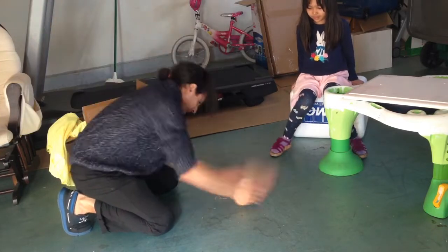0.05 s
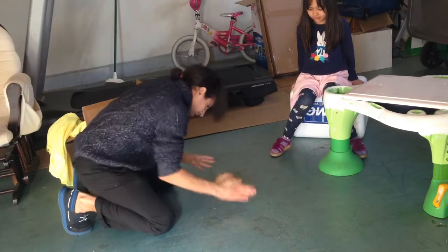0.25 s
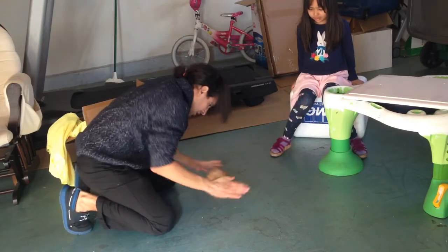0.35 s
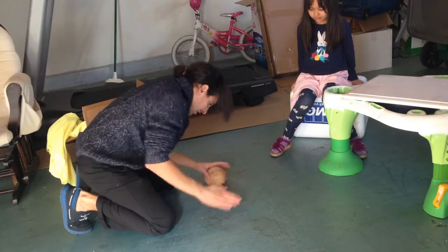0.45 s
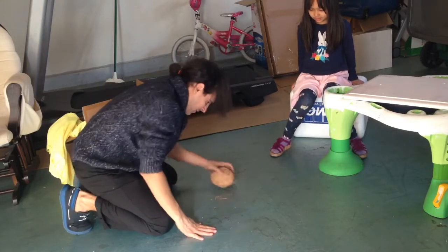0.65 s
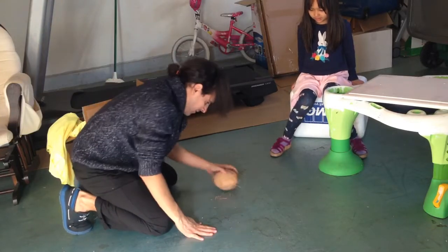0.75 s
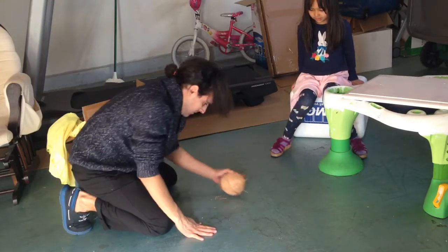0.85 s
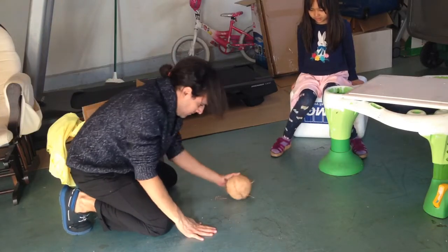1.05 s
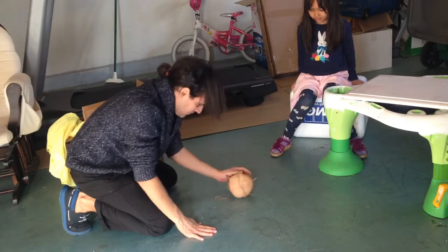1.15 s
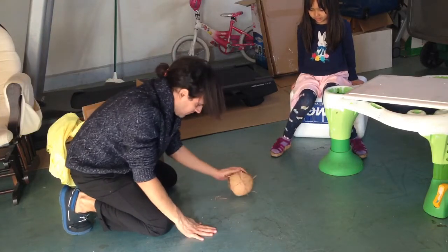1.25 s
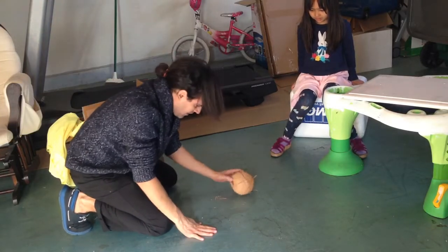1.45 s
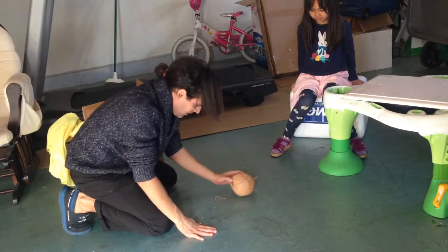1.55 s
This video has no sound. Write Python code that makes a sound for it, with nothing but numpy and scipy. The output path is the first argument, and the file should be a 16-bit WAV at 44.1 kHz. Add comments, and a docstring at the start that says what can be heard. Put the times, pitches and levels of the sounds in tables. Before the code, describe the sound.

A coconut is slammed on a hard floor, cracking sharply with a hollow boom and a light clack. A soft thud and a faint tap follow, each echoing briefly in a garage over a low rumble and hiss.

```python
"""Cracking a coconut on a garage floor

A hand slams a coconut on the hard floor: the shell cracks in quick, ringing snaps, booms and clacks
once more. A sleeve swishes, the coconut comes down again with a soft thud, and a faint tap follows.
Each knock is a shaped click that echoes briefly around the room, over a low rumble and hiss."""
import sys
import numpy as np
from scipy import signal
from scipy.fft import rfft, irfft
from scipy.io import wavfile

SR = 44100
rng = np.random.default_rng(int(sys.argv[2]) if len(sys.argv) > 2 else 0)


def bounce(signal):
    """Save signal as a 16-bit WAV file at the path given by the first command-line argument."""
    frames = np.transpose(np.atleast_2d(signal))
    limited = np.clip(frames, -1, 1)
    pcm = np.round(limited * 32767).astype(np.int16)
    wavfile.write(sys.argv[1], SR, pcm)


N = 70560

# A "tone" table says how strong a sound is at each pitch, from low to high.
# Background rumble and hiss: pitch_hz, level_db
BACKGROUND_TONE = [(20, -24.5), (38, -18.5), (58, -0.5), (80, -1), (130, -8.5), (250, -13), (500, -20.5),
                   (1000, -23), (4400, -23), (9000, -26), (15000, -26.5)]
# Time the room's echo takes to fade by 60 dB: pitch_hz, fade_s
ROOM_FADE = [(60, 0.97), (180, .6), (400, .52), (1000, 0.49), (2600, .47), (4500, 0.4844), (8000, .4),
             (14000, .35)]
# Single echoes off the walls: delay_s, level_db
WALL_ECHOES = [(.0042, -18), (0.015, -10), (0.0173, -11), (0.02, -11.5), (.0262, -17)]
# What the walls bounce back: pitch_hz, level_db
WALL_TONE = [(100, 2), (6000, 0), (9000, -.5), (15000, -1)]
# Notes that ring between the walls: pitch_hz, level_db, fade_s
ROOM_NOTES = [(200.7, -65.5, 0.53), (272.8, -66, 0.4), (355, -63.5, 0.57), (428, -65.5, 0.494),
              (569, -62, 0.64)]
# Swishes of the sleeve: peak_s, width_s, level_db
SLEEVE_SWISHES = [(0.19, .025, -61), (0.76, .03, -62)]
# Rubbing cloth: pitch_hz, level_db
CLOTH_TONE = [(100, -8.5), (500, -2), (1500, -1.5), (2400, -3.5), (3800, 2), (6000, -3), (8000, -2),
              (15000, -13)]
# The faint last tap: pitch_hz, level_db
TAP_TONE = [(100, -27), (600, -23.5), (1400, -22.5), (2400, -22), (4000, -32), (7000, -35.5), (14000, -54)]
# The dull push of the husk giving way: pitch_hz, level_db
HUSK_TONE = [(30, -22), (90, -6.5), (180, 2), (350, -2), (700, -17), (1500, -48.5), (4000, -64)]
# The soft thud on the floor: pitch_hz, level_db
THUD_TONE = [(30, -26), (90, -7), (180, 5), (400, 7), (650, -2), (900, -9.5), (1200, -6.5), (1500, -20),
             (2400, -28.5), (4000, -46), (12000, -56)]
# The shell's light second knock: pitch_hz, level_db
CLACK_TONE = [(60, -15.5), (180, 7), (370, 5.5), (600, -8.5), (1500, -8), (2300, 8.5), (3600, 8.5),
              (5500, -6), (8000, -25), (11500, -25), (15000, -49)]
# The weight of the slam on the floor: pitch_hz, level_db
SLAM_TONE = [(25, -26.5), (45, -10), (75, 9.5), (120, 10), (190, 20.5), (300, 12.5), (420, 11), (600, -0.5),
             (1200, -9), (4000, -39)]
# Notes of the hollow boom: pitch_hz, level_db, rise_s, fade_s
BOOM_NOTES = [(102.17, -26, .06, .3), (188, -16, .032, .3), (171.5, -30.5, 0.0038, .6),
              (249, -31.5, 0.016, .3)]
# Snaps of the breaking shell: start_s, level_db
SHELL_SNAPS = [(0.2031, -18), (0.2039, 2), (0.2065, -4), (0.2075, -1.5), (0.2099, -2)]
# The click of one snap: pitch_hz, level_db
SNAP_TONE = [(100, -19), (500, -8), (900, -2.5), (1600, 0), (2600, 9.5), (3500, 7), (4400, 11.3),
             (6200, 2.7), (8500, -10.5), (11300, -9), (15000, -20)]
# Notes the shell rings with: pitch_hz, level_db, fade_s
SHELL_NOTES = [(2674, -37, .09), (3550, -50, 0.1), (4150, -35.5, 0.099), (4240, -43.5, .05),
               (5434, -66, .06)]


def gain(db):
    """Turn decibels into a number to multiply a sound by."""
    return 10 ** (np.asarray(db) / 20)


def look_up(table, hz):
    """Read a table between its rows, with pitches spaced as on a piano."""
    pitches, values = np.transpose(table)
    return np.interp(np.log(hz + 1), np.log(pitches), values)


def place(start_s, sound):
    """Put a sound on a silent track at start_s."""
    return np.pad(sound, (round(start_s * SR), N))[:N]


def play_through(sound, response):
    """Let every sample of a sound set off its own copy of the response."""
    return signal.fftconvolve(sound, response)[:N]


def click(tone, size=8192):
    """A click with the given tone that starts sharply and dies away."""
    log_gain = np.log(gain(look_up(tone, abs(np.fft.fftfreq(size, 1 / SR)))))
    spectrum = np.exp(np.conj(signal.hilbert(log_gain)))  # packs the energy at the start
    return np.fft.ifft(spectrum).real[:size // 2]


def noise(tone):
    """Steady noise with the given tone and a typical size of 1."""
    shape = gain(look_up(tone, np.fft.rfftfreq(N, 1 / SR)))
    hiss = irfft(rfft(rng.standard_normal(N)) * shape, N)
    return hiss / hiss.std()


def background(level_db=-62):
    """The room's steady low rumble and hiss."""
    return gain(level_db) * noise(BACKGROUND_TONE)


def in_room(sound, room_db, build_s=0.0024, early_db=3, early_s=.09):
    """A sound plus the room's answer: a fading wash of echoes, a few clear ones and ringing notes."""
    t = np.arange(N) / SR
    slot = 6  # one random bounce in every 6 samples
    starts = np.arange(0, N - slot, slot)
    bounces = np.zeros(N)
    bounces[starts + rng.integers(0, slot, len(starts))] = rng.choice([-1, 1], len(starts))
    # Each band of pitch fades at its own speed.
    hz, times, bands = signal.stft(bounces, SR, nperseg=256)
    fade = gain(-60 * times / look_up(ROOM_FADE, hz)[:, None])
    tail = signal.istft(bands * fade, SR, nperseg=256)[1][:N]
    tail *= 1 - np.exp(-(t / build_s) ** 2)
    tail *= gain(early_db * np.exp(-(t / early_s) ** 2))  # stronger at first
    tail /= np.linalg.norm(tail)
    for delay_s, db in WALL_ECHOES:
        tail[round(delay_s * SR)] += gain(db)
    for pitch_hz, db, fade_s in ROOM_NOTES:
        tail += gain(db - 60 * t / fade_s) * np.sin(2 * np.pi * pitch_hz * t)
    reflected = play_through(sound, click(WALL_TONE))
    return sound + gain(room_db) * play_through(reflected, tail)


def sleeve():
    """Cloth rubs as the arm moves, so its noise swells and fades."""
    t = np.arange(N) / SR
    swells = sum(gain(db) * np.exp(-((t - peak_s) / width_s) ** 2 / 2)
                 for peak_s, width_s, db in SLEEVE_SWISHES)
    return noise(CLOTH_TONE) * swells


def tap(start_s=1.156):
    """The coconut settles with a faint tap."""
    return in_room(place(start_s, click(TAP_TONE)), room_db=4)


def thud(touch_s=1, husk_s=1.0346, land_s=1.037, touch_db=-28):
    """The coconut touches lightly, its husk gives way, then its full weight lands."""
    weight = click(THUD_TONE)
    touch = place(touch_s, gain(touch_db) * weight)
    husk = place(husk_s, -click(HUSK_TONE))
    return in_room(touch + husk + place(land_s, weight), room_db=1)


def through_shell(sound, spread_s, points=40):
    """Waves cross the shell at uneven speeds, so each pitch comes out a little late."""
    size = 2 * len(sound)
    hz = np.fft.rfftfreq(size, 1 / SR)
    delay_s = np.interp(hz, np.linspace(0, SR / 2, points), spread_s * rng.random(points))
    phase = -2 * np.pi * np.cumsum(delay_s) * hz[1]
    return irfft(rfft(sound, size) * np.exp(1j * phase))[:len(sound)]


def clack(start_s=0.3238):
    """The shell knocks once more, lightly."""
    knock = through_shell(click(CLACK_TONE), spread_s=0.001023)
    return in_room(place(start_s, knock), room_db=-.5)


def slam(start_s=0.2035):
    """The coconut hits the floor with a deep knock, which sets off a swelling, hollow boom."""
    t = np.arange(N) / SR
    boom = np.zeros(N)
    for hz, db, rise_s, fade_s in BOOM_NOTES:
        swell = 1 - np.exp(-(t / rise_s) ** 2)
        boom += swell * gain(db - 60 * t / fade_s) * np.sin(2 * np.pi * hz * t)
    knock = in_room(place(start_s, click(SLAM_TONE)), room_db=2.5)
    return knock + place(start_s, boom)


def crack():
    """The shell breaks in a quick run of snaps, and each one makes it ring."""
    burst = click(SNAP_TONE)
    t = np.arange(len(burst)) / SR
    ring = sum(gain(db - 60 * t / fade_s) * np.cos(2 * np.pi * hz * t) for hz, db, fade_s in SHELL_NOTES)
    track = np.zeros(N)
    for start_s, db in SHELL_SNAPS:
        snap = gain(db) * through_shell(burst + ring, spread_s=0.001097)
        track += in_room(place(start_s, snap), room_db=3.5)
    return track


def scene():
    """Add the coconut, the sleeve and the background into one channel."""
    coconut = tap() + crack() + slam() + clack() + thud()
    return (coconut + sleeve() + background())[None]


def record(dry, cutoff_hz=15350):
    """Take away the very highest pitches."""
    low_pass = signal.firwin(511, cutoff_hz, window=("kaiser", 9), fs=SR)
    return signal.oaconvolve(dry, low_pass[None], "same")


dry = scene()
out = record(dry)
bounce(out)
```